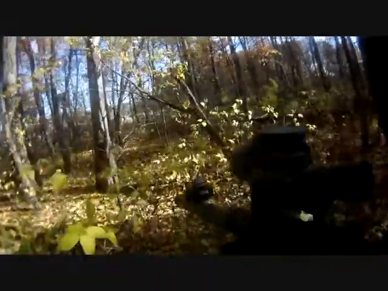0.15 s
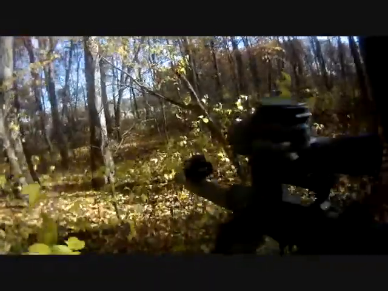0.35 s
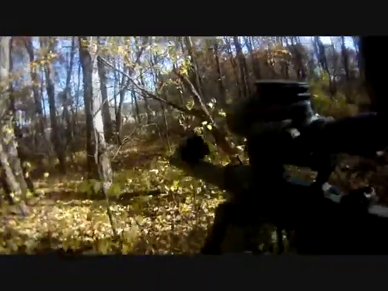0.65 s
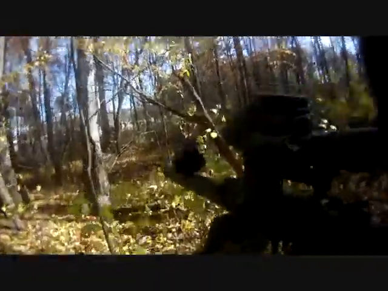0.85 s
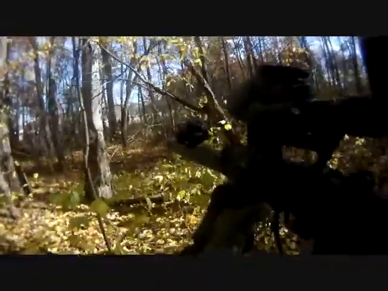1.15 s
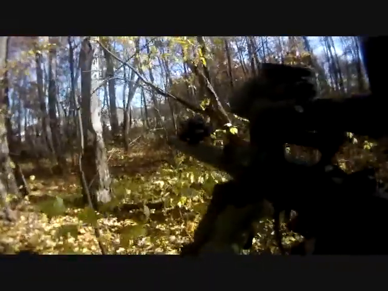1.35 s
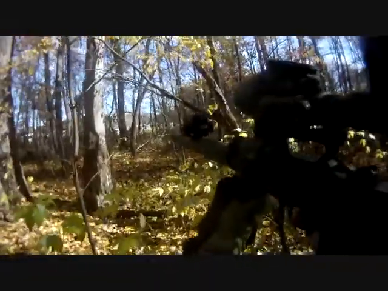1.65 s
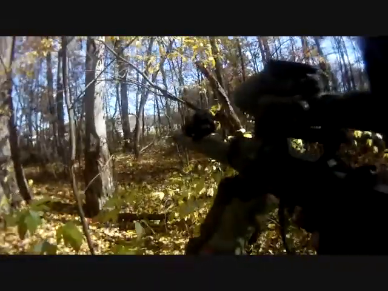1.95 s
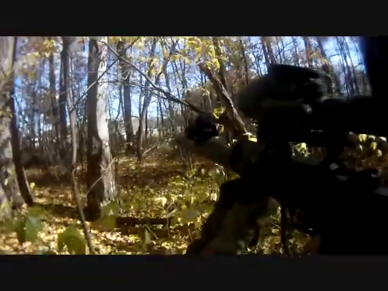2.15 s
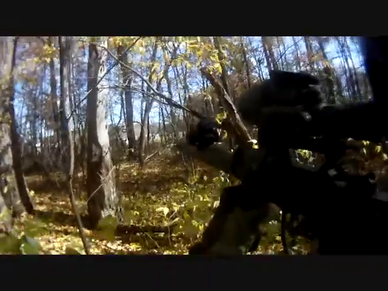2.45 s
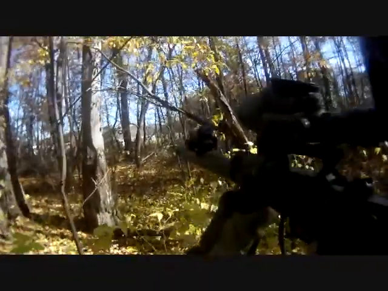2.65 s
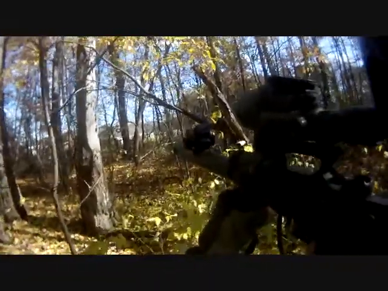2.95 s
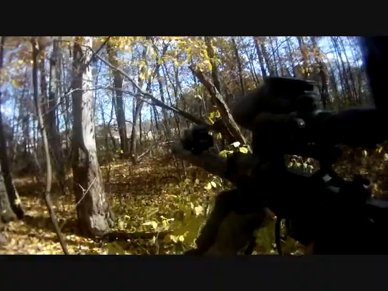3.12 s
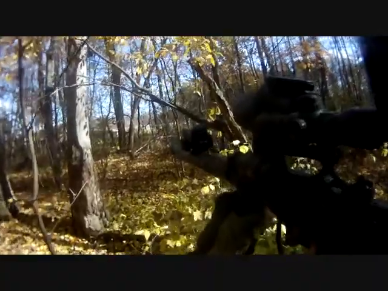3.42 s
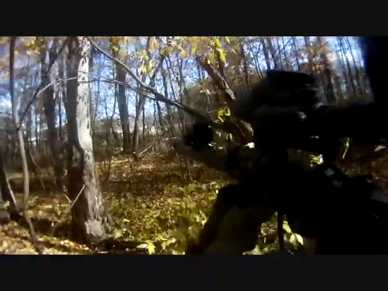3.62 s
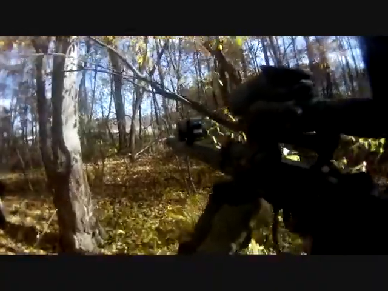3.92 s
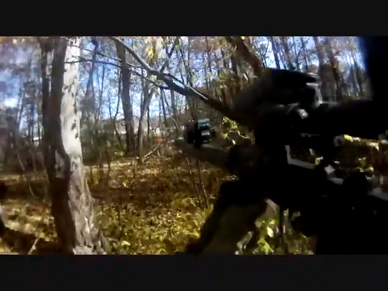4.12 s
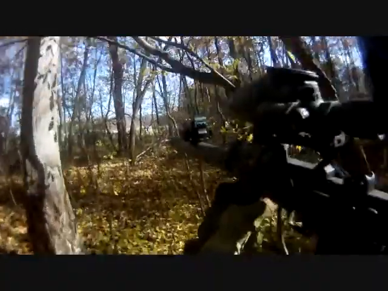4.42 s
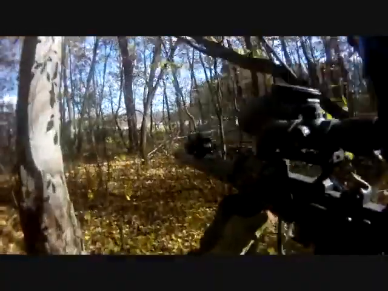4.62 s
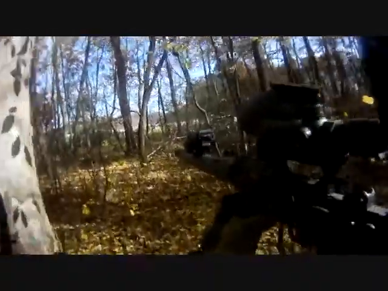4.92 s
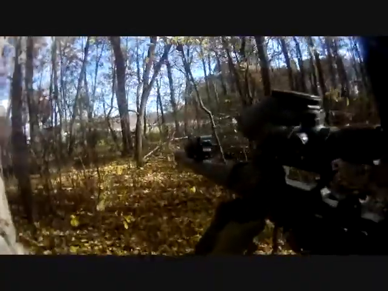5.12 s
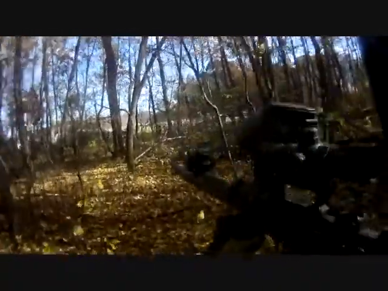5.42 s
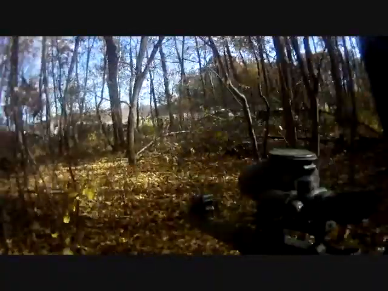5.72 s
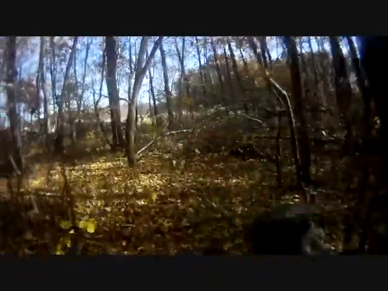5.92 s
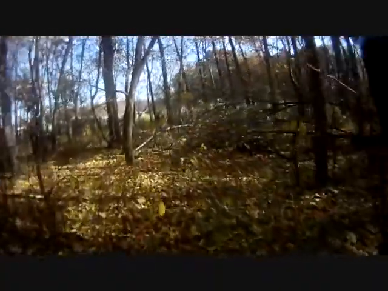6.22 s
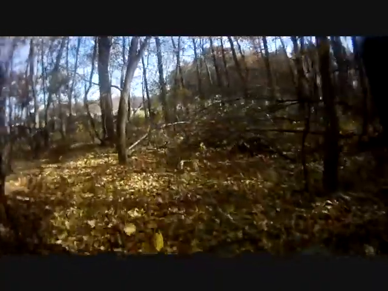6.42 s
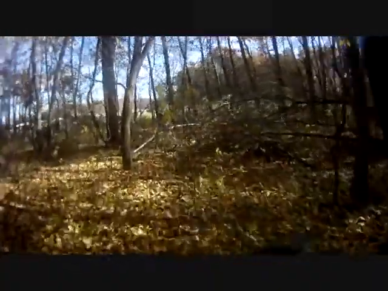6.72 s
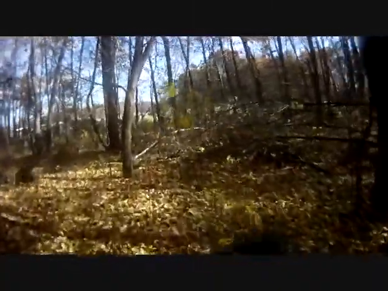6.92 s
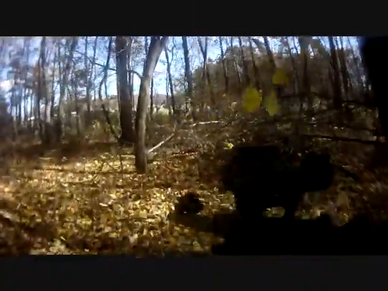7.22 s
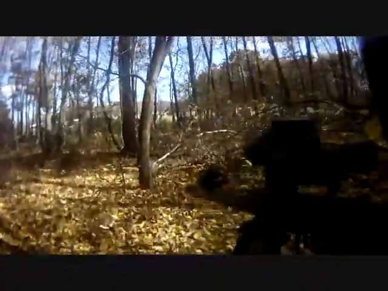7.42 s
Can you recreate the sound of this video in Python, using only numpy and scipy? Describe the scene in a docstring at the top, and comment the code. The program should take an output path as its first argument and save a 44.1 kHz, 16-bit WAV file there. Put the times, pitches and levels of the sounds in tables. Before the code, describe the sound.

A player creeps through dry autumn leaves, microphone in a small housing on the mask. A few far pops and one sharp splat come early, then a near-quiet lull. A close paintball marker fires three fast, loud, clacking shots, and after a pause three more. Distant pops then continue at a steady pace with splats, low knocks and leaf crunch, echoing off the trees over faint wind and preamp hiss.

```python
"""Dry leaves rustle and scuff among far pops and ball splats as a paintball player creeps through autumn woods with
a small camera on the mask. Up close, two strings of three shots: each is a sear click, a rush of gas, a pressure
wave bouncing in the barrel and the bolt slamming back, with shaped noise over a ringing metal body.
Pops, splats and a few low knocks are short pressure swings under cracks of noise; the trees answer with lumpy noise.
Rustle and the wash after shots are grainy noise in flickering bands, wind is low noise, the preamp hisses faintly."""
import sys
import numpy as np
from scipy import signal
from scipy.fft import rfft, irfft
from scipy.io import wavfile
from scipy.ndimage import uniform_filter1d

SR = 44100
rng = np.random.default_rng(int(sys.argv[2]) if len(sys.argv) > 2 else 0)


def digitize_waveform(pressure):
    """Quantize a signal to 16-bit integers and store it at the path in sys.argv[1].

    Rows of a 2-D input are taken as channels; values are limited to [-1, 1].
    """
    field = np.atleast_2d(pressure).T
    bounded = np.clip(field, -1, 1)
    quanta = np.round(bounded * 32767).astype(np.int16)
    wavfile.write(sys.argv[1], SR, quanta)


N = 333396

# shots of the near marker, timed at the muzzle front: start_s, blast_db, bolt_db
NEAR_SHOTS = [(2.2716, -3, 0), (2.4391, -.7, 0), (2.5903, -1.3, 0), (4.0945, -.6, 0), (4.2418, -1.5, 0),
              (4.4339, -2, -1)]
# when each step of the firing cycle starts, from the muzzle front: lag_s
# (sear lets go, bolt seats the ball, valve opens, gas leaves, bolt slams back, parts rattle to rest)
CYCLE_LAGS = [-.0215, -.0102, -.0050, .0030, .0102, .0150]
# noise of each step, before the shot's bolt_db:
# peak_db, rise_s, t60_s, centre_hz, width_hz, fizz_over_peak_db, knock_db (on the body)
CYCLE_NOISE = [(-21, .0008, .035, 4500, 6500, -12, -14), (-27, .0004, .020, 3000, 4000, -18, -24),
               (-16, .0030, .060, 2500, 8000, -10, -30), (-14, .0030, .060, 2500, 5000, -14, -14),
               (-4, .0003, .016, 4200, 5000, -14, 0), (-24, .0030, .120, 2000, 6000, -18, -30)]
# ringing modes of the marker's metal body, before the knock level: mode_hz, level_db, t60_s
BODY_MODES = [(1096, -57, 0.36), (2284, -26.5, 0.046), (2650, -40, 0.21), (3260, -63, 0.17),
              (3917, -18, 0.028), (6600, -53, 0.3)]
# far markers: start_s, thump_peak_db, thump_hz, crack_over_thump_db, ring_hz, echo_send_db
FAR_SHOTS = [(0.71, -40.5, 494, 0, 2610, 15.5), (0.902, -32, 503, -20, 2550, 0),
             (0.962, -31, 594, -6, 2240, -14), (3.339, -37.5, 576, -2.5, 3220, 7),
             (3.75, -26, 625, 1.5, 2650, 4.5), (4.151, -24.5, 644, -4, 2450, 9),
             (4.543, -25.5, 612, -1, 2550, 4), (4.957, -25, 597, 0.5, 2720, -13),
             (5.085, -11.5, 520, 0, 2430, -0.5), (5.151, -27, 625, 2, 2420, -5),
             (5.281, -25, 633, 0.5, 3050, 9.5), (5.503, -24.5, 640, -6.5, 1510, 9),
             (5.687, -25, 650, -8, 2400, 9.5), (5.87, -25, 627, -4.5, 1450, 9.5),
             (6.061, -24.5, 608, -6.5, 1400, 9), (6.313, -25.5, 604, -5, 3090, 9.5),
             (6.534, -26, 673, -12.5, 2230, 11), (6.747, -24.5, 612, -7, 4370, 7),
             (6.929, -26, 607, -5.5, 1720, 11), (7.211, -41.5, 505, 0, 3010, 10),
             (7.378, -43.5, 567, -12, 2320, -9)]
# ball splats, and a few low knocks like footfalls or bumps on the mask:
# start_s, crack_peak_db, ring_hz, thump_over_crack_db, thump_hz, treble_over_crack_db, t60_s
SPLATS_AND_KNOCKS = [(0.6107, -46, 2610, -15, 432, -19, 0.027), (0.6861, -46, 2700, -14, 554, 6.5, 0.051),
                     (0.8544, -14.5, 3150, -11.5, 467, -7, 0.028), (1.3367, -49, 3250, -25, 423, 3, .02),
                     (2.1605, -52, 3840, -12, 550, 2, .012), (2.334, -52, 3930, -20, 550, 15, .012),
                     (2.385, -47, 3920, -22, 550, 2, .012), (2.496, -44, 3000, -18, 550, 9, .015),
                     (2.553, -47, 4200, -20, 550, 4, .012), (2.67, -44, 2600, -15, 550, 5, 0.014),
                     (2.9237, -47, 2970, -8, 496, -14, 0.035), (3.693, -42.5, 2910, -30, 574, -5, 0.02),
                     (3.9314, -59.5, 2480, -10, 595, 21.5, 0.029), (3.9943, -46, 2600, -15, 528, 2.5, .02),
                     (4.317, -46, 3880, -20, 587, 9, .015), (4.3605, -39, 3940, -23, 580, 1, 0.024),
                     (4.535, -49, 3900, -20, 555, 10, 0.011), (4.8293, -26.5, 2700, -10, 364, -1.5, 0.051),
                     (4.9676, -22.5, 3080, -3, 1340, -29, 0.018),
                     (5.0444, -37, 2340, -24, 1280, -27, 0.012),
                     (5.4507, -36.5, 2500, -25, 549, -20, 0.022),
                     (6.1294, -26, 2920, -3, 1380, -25, 0.0042),
                     (6.2201, -28.5, 4220, -9.5, 165, -3.5, .054), (6.4326, -30, 2540, -3.5, 312, -6, 0.06),
                     (6.648, -29, 2430, -8, 185, -9, 0.074), (7.167, -41, 2320, -3, 1230, -2.5, 0.032),
                     (7.3015, -47, 3120, -5, 505, -7, 0.035)]
# boots scuffing leaves, and at 5.14 s a short dull burst of a far shot beside the far pops:
# start_s, length_s (before the release), rms_db, centre_hz
SCUFFS_AND_BURST = [(0.973, 0.011, -47.5, 2270), (1.053, 0.013, -44.5, 1930), (1.436, 0.037, -61.5, 2400),
                    (1.693, 0.064, -62, 3220), (3.19, 0.1, -54, 2250), (4.79, 0.018, -43.5, 910),
                    (4.861, 0.028, -43.5, 905), (5.14, 0.017, -37.5, 1250), (6.632, 0.018, -50, 2180),
                    (7.086, 0.021, -42, 2370), (7.476, 0.043, -44, 2220)]
# rustle underfoot, with the wash of echoes after the shots, before flicker: time_s, crisp_db, body_db
RUSTLE_AND_WASH = [(0, -64, -64), (.29, -57, -58), (.44, -59, -57.5), (.7, -54.5, -53), (.82, -57, -60),
                   (.95, -50.5, -50.5), (1.2, -64.5, -60.5), (1.68, -60.5, -63), (2.1, -67.5, -67.5),
                   (2.501, -53.5, -52.5), (3.051, -67.5, -67), (3.3, -59, -54), (3.68, -57.5, -58),
                   (3.83, -49, -52.5), (4.1, -57, -59.5), (4.45, -44.5, -47), (4.74, -51.5, -53.5),
                   (4.86, -47.5, -49), (5.2, -45.5, -45.5), (5.68, -55, -57.5), (5.9, -52, -54),
                   (6.19, -54, -52.5), (6.35, -47, -50.5), (6.59, -49, -50), (6.72, -48.5, -52),
                   (7.0, -44, -48.5), (7.24, -56.5, -58), (7.56, -57.5, -53.5)]
# wind on the microphone, before flicker: time_s, level_db
WIND_LEVELS = [(0, -73), (.29, -60), (.46, -73), (.9, -64), (1.22, -73), (1.68, -75.5), (2.2, -76),
               (3.05, -76), (3.24, -61.5), (3.4, -70.5), (3.9, -62.5), (4.86, -63), (5.5, -59.5),
               (5.8, -68), (6.25, -56), (6.6, -56), (6.85, -67), (7.01, -56), (7.24, -69), (7.56, -62.5)]
# resonances of the camera housing in front of the microphone: centre_hz, width_hz, level_db
HOUSING_PEAKS = [(582, 288, 9.5), (1393, 490, -9), (2373, 670, -6), (3064, 117, -4.5), (3954, 1060, -11),
                 (6550, 990, -13.5), (8400, 1600, -17.5), (12300, 13000, -21)]

# barrel: the first round trip is longer because the gas is still slow
FIRST_TRIP_S, TRIP_S = .00148, .00106
RETURN, TRIP_HZ = .82, 3500  # share sent back, lowpass at every trip
FALL_S = .0004  # fall time constant of a front
PUSH_S, PUSH_DB = .0013, -7  # lead and level of the suction ahead of the front
RECOIL_S, RECOIL_DB = .00053, -20  # the kick reaches the mask as a dull push
CAVITY_DB = -15.5  # the blast also sets the housing ringing

# pops and splats
RING_T60_S = .011
FAR_TREBLE_DB = -5  # over the crack
FAR_TIGHT_T60_S, FAR_SMEARED_T60_S = .018, .072  # smeared where the crack is weaker than the thump
SPLAT_ECHO_DB = 1.5

# woods: level_db and t60_s of each stand of trunks
NEAR_TRUNKS, FAR_TRUNKS = (-18.5, .28), (-19.5, .62)
TREBLE_SHARE = .91  # treble decay time over low decay time
NEAR_ECHO_DB = -10  # near marker's send to the trees

# the louder the rustle and wash, the brighter: treble_db at a crisp level of QUIET_DB, and its rise per dB
QUIET_DB, TREBLE_DB, TREBLE_PER_DB = -56, -70.5, 1.52

# housing and recorder
HOUSING_BASE_DB, HOUSING_BASE_HZ = -15, 6500  # leak between the peaks and where it fades
HOLE_HZ, HOLE_WIDTH_HZ, HOLE_DB = 10450, 900, -11
PREAMP_HISS_DB, TOP_HZ = -65, 15700


def undb(db):
    """Decibels to a gain."""
    return 10 ** (np.asarray(db) / 20)


def rms(x, db):
    """Scale x to an rms level in dB."""
    return x * undb(db) / np.sqrt(np.mean(x ** 2))


def peak(x, db):
    """Scale x to a peak level in dB."""
    return x * undb(db) / np.max(np.abs(x))


def band(x, lo_hz, hi_hz):
    """Second-order Butterworth band-pass."""
    sos = signal.butter(2, [lo_hz, min(hi_hz, .45 * SR)], "bandpass", fs=SR, output="sos")
    return signal.sosfilt(sos, x)


def around(hz, width_hz):
    """Edges of a band with its centre on a log axis."""
    lo_hz = np.sqrt(hz ** 2 + width_hz ** 2 / 4) - width_hz / 2
    return lo_hz, lo_hz + width_hz


def decay(t, t60):
    """Exponential fall of 60 dB in t60 seconds."""
    return np.exp(-np.log(1000) * t / t60)


def add(track, s, x):
    """Mix x into track from time s."""
    i = int(round(s * SR))
    track[i:i + len(x)] += x[:N - i]


def walk(rate):
    """Random levels held 1 / rate s and slewed twice; spread near 1."""
    hold = int(SR / rate)
    levels = np.repeat(rng.standard_normal(N // hold + 1), hold)
    slewed = uniform_filter1d(uniform_filter1d(levels, hold), hold)
    return 1.3 * slewed[:N]


def barrel(colour):
    """A steep front that flips sign and dulls at every round trip of the open barrel, led by suction."""
    t = np.arange(int(.04 * SR)) / SR
    front = np.exp(-t / FALL_S) * (1 - np.exp(-t / .00004))
    soften = signal.butter(1, TRIP_HZ, fs=SR)
    # suction behind the ball comes first
    wave = -undb(PUSH_DB) * signal.lfilter(*soften, front)
    s = PUSH_S
    for trip in range(1, 8):
        i = int(s * SR)
        wave[i:] += front[:-i]
        s += FIRST_TRIP_S if trip == 1 else TRIP_S
        # the gas empties, so every trip loses more than the last
        front = -RETURN ** trip * signal.lfilter(*soften, front)
    wave = peak(band(wave, 285, 18000), 0)
    wave += peak(signal.fftconvolve(wave, colour)[:len(t)], CAVITY_DB)
    recoil = peak(band(t * np.exp(-t / RECOIL_S), 83, 400), RECOIL_DB)
    return peak(wave + recoil, 0)


def burst(colour, rise, t60, lo_hz, hi_hz):
    """A puff of band-limited noise heard through the housing."""
    t = np.arange(int(.2 * SR)) / SR
    puff = rng.standard_normal(len(t)) * (1 - np.exp(-t / rise)) * decay(t, t60)
    return signal.fftconvolve(band(puff, lo_hz, hi_hz), colour)


def body_ring():
    """Loose parts keep knocking the metal body: noise in narrow bands, so its modes ring rough."""
    t = np.arange(int(.4 * SR)) / SR
    settle = 2000  # samples for the filters to reach full level
    knocks = rng.standard_normal(len(t) + settle)
    return sum(rms(band(knocks, *around(hz, 69))[settle:], db) * decay(t, t60)
               for hz, db, t60 in BODY_MODES)


def marker(colour):
    """The near marker: the same mechanical cycle at every pull, never with the same noise."""
    out = np.zeros(N)
    blast = barrel(colour)
    for s, blast_db, bolt_db in NEAR_SHOTS:
        add(out, s - PUSH_S, undb(blast_db) * blast)
        for lag, step in zip(CYCLE_LAGS, CYCLE_NOISE):
            db, rise, t60, hz, width_hz, fizz_over_db, knock_db = step
            noise = burst(colour, rise, t60, *around(hz, width_hz))
            fizz = burst(colour, rise, t60, 5300, 19000)
            add(out, s + lag, peak(noise, db + bolt_db))
            add(out, s + lag, peak(fizz, db + fizz_over_db + bolt_db))
            add(out, s + lag, undb(bolt_db + knock_db) * body_ring())
    return out


def pop(colour, thump_db, thump_hz, swings, crack_db, crack_hz, treble_db, t60, rise):
    """A few swings of pressure, suction first, under a crack of noise and one short ring."""
    t = np.arange(int(.06 * SR)) / SR
    swing = -np.sin(2 * np.pi * thump_hz * t)
    thump = swing * (1 - np.exp(-t / .00027)) * np.exp(-(t * thump_hz / swings) ** 2)
    ring = np.sin(2 * np.pi * crack_hz * t) * (1 - np.exp(-t / rise)) * decay(t, RING_T60_S)
    out = peak(burst(colour, rise, t60, 1100, 5500), crack_db)
    out += peak(burst(colour, rise / 2, t60, 5600, 12900), treble_db)
    add(out, 0, peak(thump, thump_db) + peak(ring, crack_db - 2))
    return out


def far_markers(colour):
    """Far muzzles: a thump of 2.7 swings under a slow-edged crack."""
    pops = []
    for s, thump_db, thump_hz, crack_over_db, ring_hz, echo_db in FAR_SHOTS:
        crack_db = thump_db + crack_over_db
        t60 = FAR_SMEARED_T60_S if crack_over_db < 0 else FAR_TIGHT_T60_S
        x = pop(colour, thump_db, thump_hz, 2.7, crack_db, ring_hz, crack_db + FAR_TREBLE_DB, t60, .0022)
        pops.append((s, x, echo_db))
    return pops


def splats_and_knocks(colour):
    """Ball splats and a few low knocks: a sharp-edged crack over a shorter thump of 1.6 swings."""
    pops = []
    for s, crack_db, ring_hz, thump_over_db, thump_hz, treble_over_db, t60 in SPLATS_AND_KNOCKS:
        x = pop(colour, crack_db + thump_over_db, thump_hz, 1.6,
                crack_db, ring_hz, crack_db + treble_over_db, t60, .00014)
        pops.append((s, x, SPLAT_ECHO_DB))
    return pops


def firefight(colour):
    """Far pops, splats and knocks, each with the share that it sends to the trees."""
    direct, send = np.zeros(N), np.zeros(N)
    for s, x, echo_db in far_markers(colour) + splats_and_knocks(colour):
        # a small offset after start_s, later still on the way to the trees
        add(direct, s + .000995, x)
        add(send, s + .0026, undb(echo_db) * x)
    return direct, send


def woods(x):
    """Scattered echoes off trunks: lumpy decaying noise whose treble dies sooner."""
    t = np.arange(int(1.2 * SR)) / SR
    lumps = rng.standard_normal(len(t)) * undb(2 * walk(150)[:len(t)])
    lumps *= 1 - np.exp(-t / .005)
    low = rms(band(lumps, 150, 2700), -9.5)
    high = rms(band(lumps, 1700, 11000), 0)
    echo = np.zeros(len(t))
    for db, t60 in (NEAR_TRUNKS, FAR_TRUNKS):
        tail = low * decay(t, t60) + high * decay(t, t60 * TREBLE_SHARE)
        # the root keeps the energy alike for short and long tails
        echo += undb(db) * np.sqrt(14 / t60 / SR) * tail
    return signal.fftconvolve(x, echo)[:N]


def crackle(colour, crackle_db):
    """Dense tiny snaps: noise in short grains of random level, through the housing."""
    grain = 64  # samples
    levels = np.repeat(rng.exponential(1, N // grain + 1), grain)[:N]
    snaps = undb(crackle_db * levels)
    return signal.fftconvolve(rng.standard_normal(N) * snaps, colour)[:N]


def rustle_and_wash(colour):
    """Leaves underfoot and the wash after shots: crackle in three bands that flicker partly together."""
    t = np.arange(N) / SR
    s, *columns = np.transpose(RUSTLE_AND_WASH)
    crisp_db, body_db = (np.interp(t, s, c) for c in columns)
    treble_db = TREBLE_DB + TREBLE_PER_DB * (crisp_db - QUIET_DB)
    bed, shared = crackle(colour, 1.5), walk(15)
    out = rms(band(bed, 250, 1050), 0) * undb(body_db + shared + walk(28))
    out += rms(band(bed, 900, 5600), 0) * undb(crisp_db + 1.5 * shared + walk(30))
    out += rms(band(bed, 4000, 11000), 0) * undb(treble_db + 1.5 * shared + 2.3 * walk(9) + walk(30))
    return out


def scuffs_and_burst(colour):
    """Boots in the leaves and one dull burst of a far shot: short gates on a band of coarser crackle."""
    t = np.arange(N) / SR
    out = np.zeros(N)
    crunch = crackle(colour, 2.3)
    for s, length, db, hz in SCUFFS_AND_BURST:
        attack, release = (t - s) / .0051, (s + length - t) / .018 + 1
        gate = np.clip(np.minimum(attack, release), 0, 1)
        out += rms(band(crunch, *around(hz, 1870)), db) * gate
    return out


def wind():
    """Wind on the microphone: low noise with a wandering level."""
    t = np.arange(N) / SR
    level_db = np.interp(t, *np.transpose(WIND_LEVELS)) + 1.8 * walk(7.9)
    return rms(band(rng.standard_normal(N), 28, 260), 0) * undb(level_db)


def housing(size=2048):
    """Causal response of the housing's cavities, from the cepstrum of their gain."""
    f = np.arange(size // 2 + 1) * SR / size
    power = undb(2 * HOUSING_BASE_DB) / (1 + (f / HOUSING_BASE_HZ) ** 4)
    for hz, width_hz, db in HOUSING_PEAKS:
        power = power + undb(2 * db) / (1 + (2 * (f - hz) / width_hz) ** 4)
    hole = np.log(undb(HOLE_DB)) * np.exp(-(2 * (f - HOLE_HZ) / HOLE_WIDTH_HZ) ** 2)
    cepstrum = irfft(np.log(power) / 2 + hole)
    # folding the cepstrum forward gives minimum phase
    cepstrum[1:size // 2] *= 2
    cepstrum[size // 2 + 1:] = 0
    return irfft(np.exp(rfft(cepstrum)))[:size // 2]


def scene():
    """Near marker, firefight, their echo off the trees, then rustle, scuffs and wind."""
    colour = housing()
    near = marker(colour)
    far, send = firefight(colour)
    echo = woods(send + undb(NEAR_ECHO_DB) * near)
    background = rustle_and_wash(colour) + scuffs_and_burst(colour) + wind()
    return (near + far + echo + background)[None]


def record(dry):
    """The preamp hisses, the recorder stops at full scale and cuts the top."""
    hiss = rms(band(rng.standard_normal(N), 296, 12000), PREAMP_HISS_DB)
    wet = np.clip(dry + hiss, -1, 1)
    return signal.sosfilt(signal.ellip(12, .2, 120, TOP_HZ, fs=SR, output="sos"), wet)


dry = scene()
out = record(dry)
digitize_waveform(out)
```